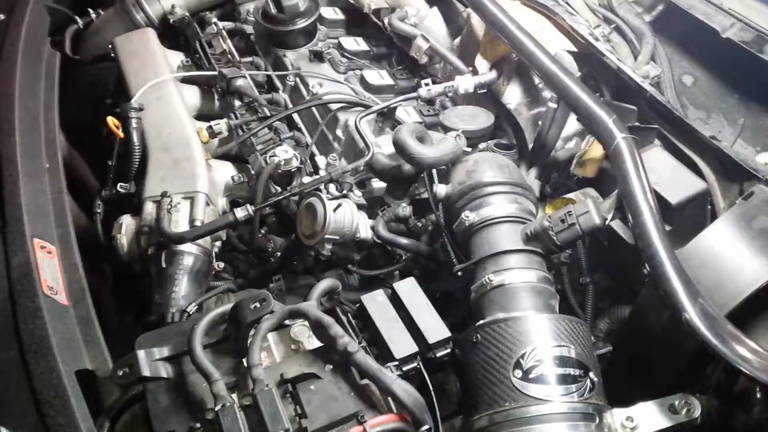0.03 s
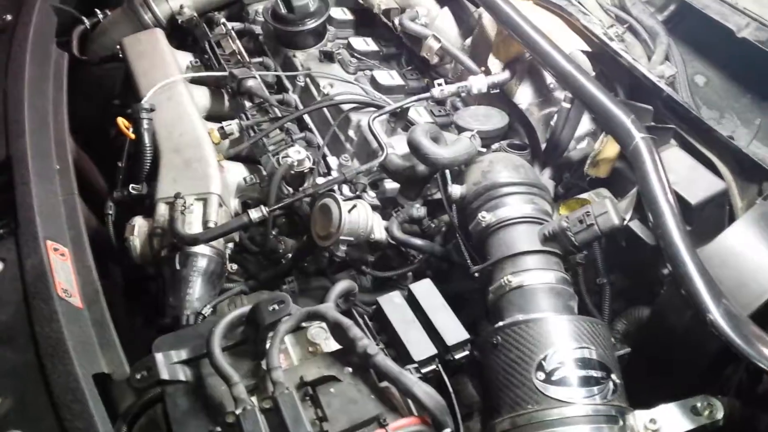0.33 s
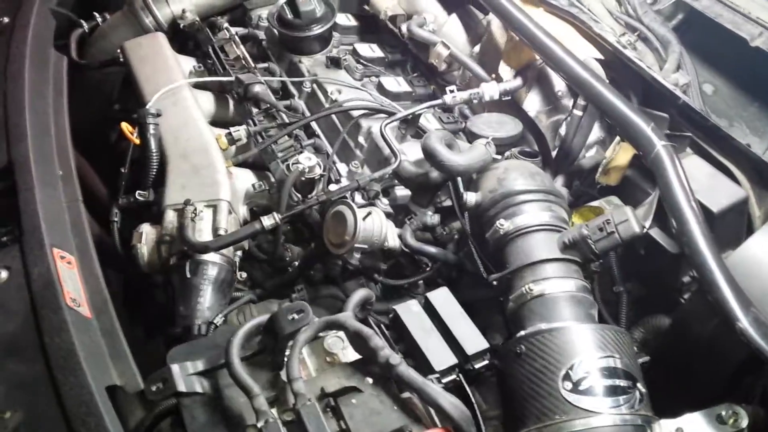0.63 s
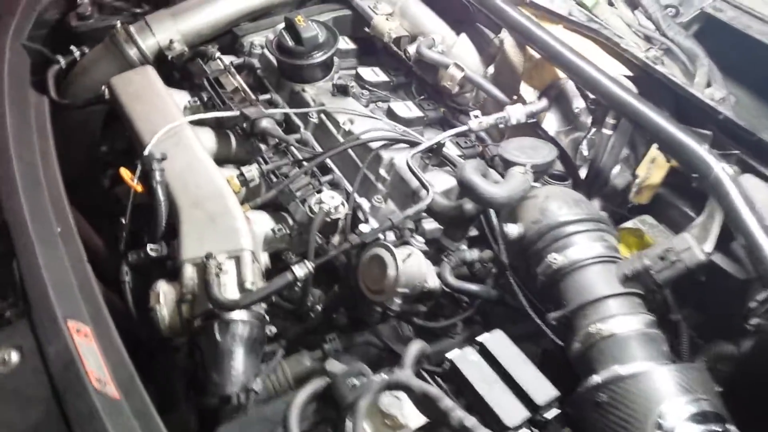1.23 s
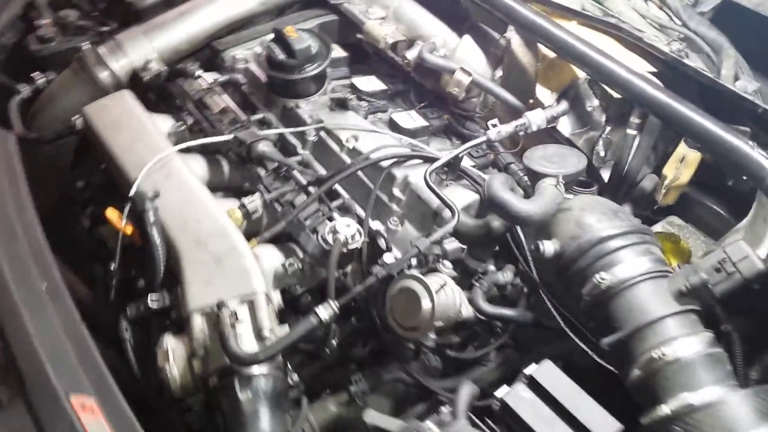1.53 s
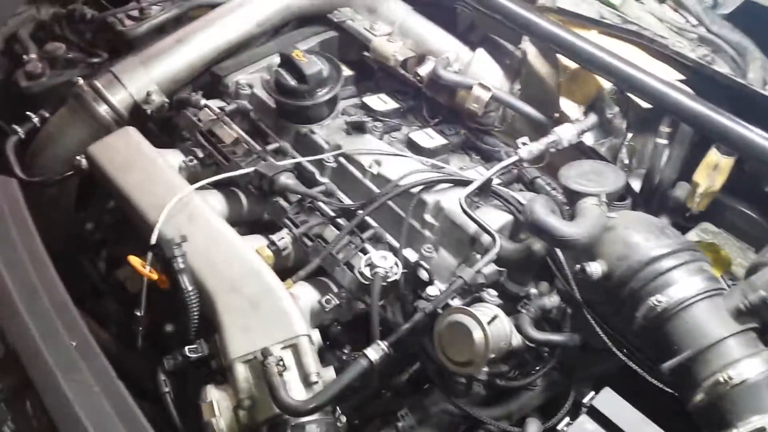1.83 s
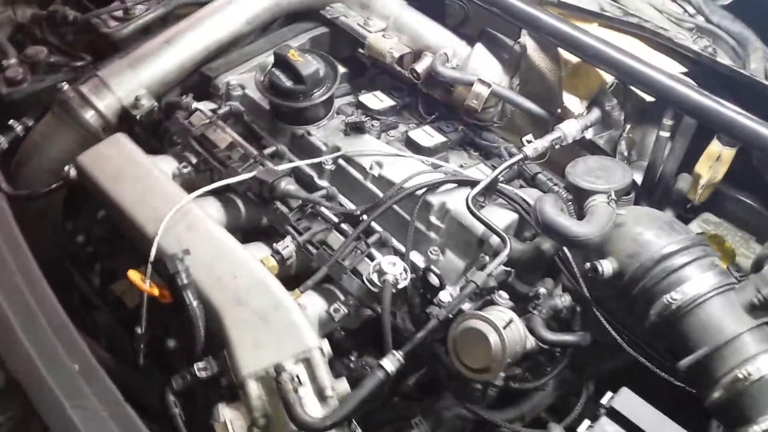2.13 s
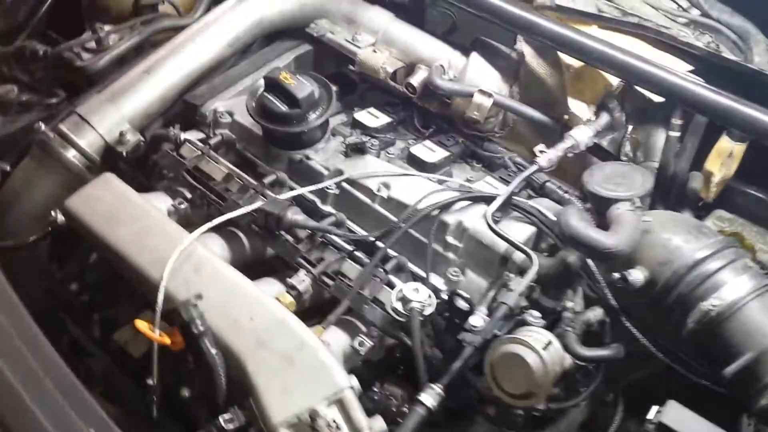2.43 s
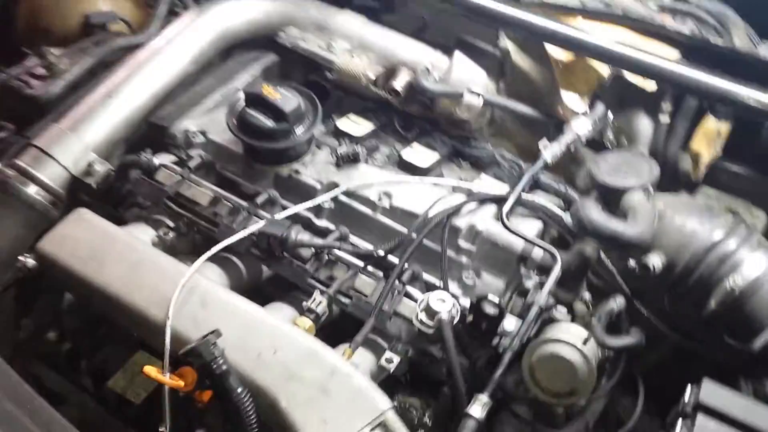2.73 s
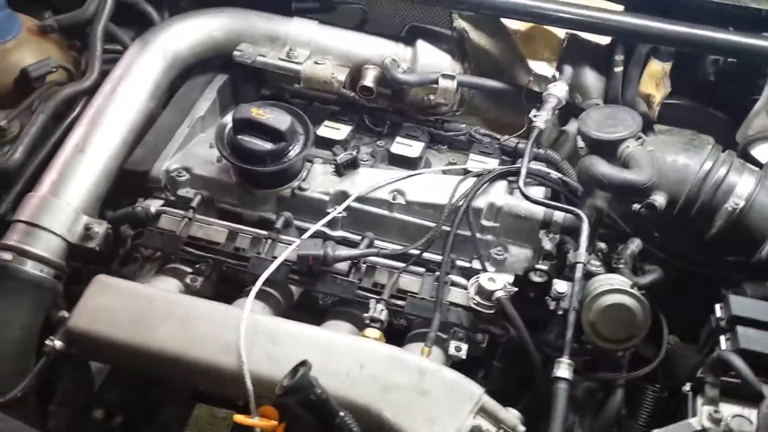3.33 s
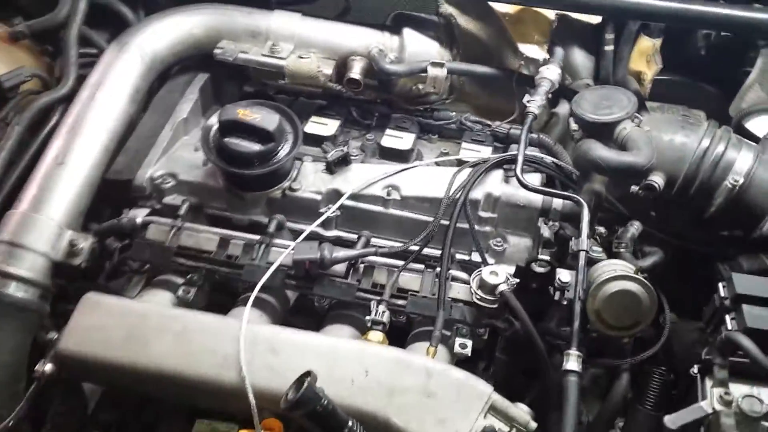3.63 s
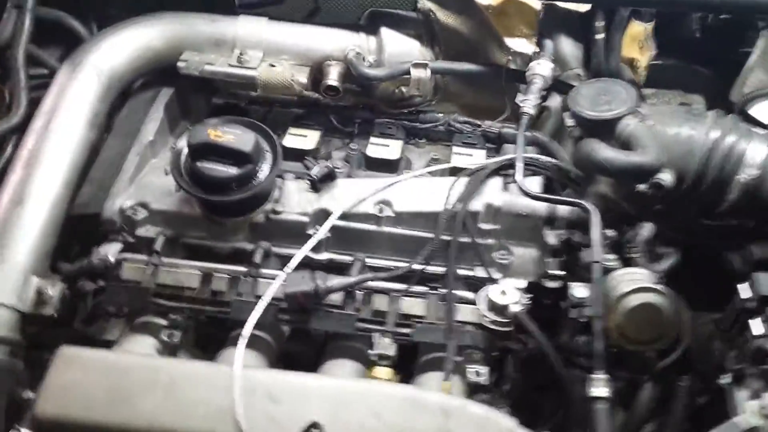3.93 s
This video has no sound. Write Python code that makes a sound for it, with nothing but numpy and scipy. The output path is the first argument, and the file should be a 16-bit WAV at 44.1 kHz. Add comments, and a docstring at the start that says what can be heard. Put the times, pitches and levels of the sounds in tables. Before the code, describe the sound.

An idling car engine hums and clatters up close, with fast, light ticks growing louder.

```python
"""Idling engine, bonnet up

A four-cylinder petrol engine idles, heard from just above the open bay. The firing drones, the
belts whine faintly, the valve gear clatters and hisses, and the injectors tick in turn. It all
fades in after a short silence; the ticks grow as the listener drifts towards the cylinder head."""
import sys
import numpy as np
from scipy import signal
from scipy.fft import rfft, irfft
from scipy.io import wavfile
from scipy.ndimage import uniform_filter1d, map_coordinates

SR = 44100
rng = np.random.default_rng(int(sys.argv[2]) if len(sys.argv) > 2 else 0)


def generate_wav(sig):
    """Save sig (samples, or channels by samples) to the path in sys.argv[1] as 16-bit PCM at SR."""
    pcm = np.round(np.clip(np.atleast_2d(sig).T, -1, 1) * 32767).astype(np.int16)
    wavfile.write(sys.argv[1], SR, pcm)


N = 176400
TIME = np.arange(N) / SR
START_S = 0.424

# Idle speed of the crank: time_s, speed_rpm
CRANK_SPEED = [(0.45, 1207.9), (0.9, 1233.1), (1.35, 1234.4), (1.9, 1223.6), (2.1, 1211.0), (2.3, 1218.9),
               (2.65, 1214.4), (2.95, 1232.4), (3.2, 1235.7), (3.4, 1223.2), (3.55, 1231.5), (3.75, 1218.1),
               (4.0, 1221.7)]
# Level ride on the main boom: time_s, level_db
BOOM_RIDE = [(0.72, -14.5), (1.02, -15), (1.07, -13.5), (2.12, -16.5), (2.32, -13.5), (2.79, -16.5),
             (3.2, -15), (3.49, -19), (3.63, -15.5), (3.78, -17.5), (3.95, -16)]
# The drone's other partials: multiple_of_cycle, level_db, waver_depth
DRONE_PARTIALS = [(4, -30, 0.14), (15, -34.5, 0.73), (18, -40, 1), (19, -40.5, .7), (20, -31.5, 0.38),
                  (24, -33.5, 0.63), (32, -47, 0.85)]
# Belt and pulley tones: multiple_of_cycle, then level_db at four evenly spaced times
BELT_TONES = [(30, -38, -48.5, -51, -46), (34.9, -45, -49, -47, -47), (37.9, -50, -45, -37.5, -42.5),
              (45.5, -31, -42, -37, -36.5), (48, -43, -41, -37, -35.5), (52, -53, -52, -38, -31.5),
              (56, -52, -38, -49.5, -32), (76.07, -55, -38.5, -36, -33), (112.8, -39, -49.5, -42, -44),
              (150.8, -64, -43, -43.5, -46), (162.8, -61, -55, -46.5, -44.5), (175.6, -45, -53, -55, -67)]
# Tone of the block, clatter below and hiss above: frequency_hz, level_db
BLOCK_EQ = [(20, -10), (60, -2), (100, 10), (140, 12), (185, 7), (240, 8.5), (340, 0.5), (420, 6), (480, 6),
            (580, 5.5), (730, 1), (950, 0.5), (1130, 2), (1330, -4), (1650, -3), (2200, -3.5)]
HISS_EQ = [(2300, -4), (2800, -2), (3650, -3), (4200, 0), (4800, -1.5), (5250, -2), (6050, -4.5),
           (6500, -8), (7300, -8.5), (8000, -6.5), (8800, -9), (12000, -13), (15500, -14)]
# EQ rides on the clatter: time_s, hum_db, low_mids_db, mids_db, presence_db, treble_db
BAND_RIDES = [(.7, -0.5, -1.5, 1, -2.5, -1), (.95, 6, -2, 1.5, -1, 0), (1.3, -4, -1.5, -0.5, -2, -.5),
              (1.8, 3.5, -.5, 0, -1.5, 0), (2.4, -3, -1, 0.5, -1, 1), (3, 0, 0, 0.5, 1.5, 0.5),
              (3.5, -6, 2, 0.5, 0.5, 0), (3.95, 0, 1, 2, 1.5, 2)]
# A low anchor, then the centres of those five bands: frequency_hz
BAND_CENTRES = [60, 200, 500, 1300, 2700, 6000]
# Passing rings in the hiss: peak_s, half_length_s, pitch_hz, half_width_hz, lift_db
HISS_RINGS = [(0.766, .1, 6190, 130, 9), (1.096, 0.24, 5260, 111, 7.5), (1.164, .2, 7850, 150, 7.5),
              (1.302, 0.16, 5720, 150, 3), (1.493, 0.091, 4200, 170, 4.5), (1.55, 0.16, 3160, 170, 6),
              (1.57, .14, 5100, 100, 7), (1.694, 0.24, 3950, 100, 10.5), (2.14, 0.18, 6940, 100, 9),
              (2.816, 0.19, 6100, 110, 4), (3.08, 0.16, 5020, 80, 2), (2.98, .15, 4200, 110, 2),
              (3.35, 0.32, 6030, 90, 7), (3.6, 0.66, 3520, 109.4, 5.5)]
# How much of the clatter comes round every cycle: frequency_hz, power_share
LOOP_SHARE = [(100, .4), (500, 0.59), (1200, 0.33), (4000, 0.34), (12000, 0.053)]
# Pan of the clatter: frequency_hz, left_minus_right_db
CLATTER_PAN = [(100, -6), (280, -1), (480, -4), (750, -5.5), (1200, -2), (2000, -4), (3200, -4.5),
               (4200, -10.5), (4900, -11.5), (5900, -11), (6700, -8), (7800, -16.5), (9000, -14.5),
               (12000, -14.5), (15000, -26)]
# Stereo focus of the clatter: frequency_hz, left_right_correlation
CLATTER_FOCUS = [(100, 0.72), (250, 1), (550, 0.66), (800, 0.62), (1100, 0.19), (2000, -0.21),
                 (15000, 0.24)]
# Injector timing: cycle_fraction, relative_level_db
INJECTOR_TIMING = [(.186, 5.5), (0.435, 4), (0.683, 2.5), (.936, 7.5)]
# Ring of an injector body: pitch_hz, relative_level_db, decay_s
INJECTOR_MODES = [(10830, -7.5, 0.0035), (11135, -9.5, 0.0016), (11234, -5.5, 0.0073), (13500, 4.5, 0.0024),
                  (13130, -1, 0.0025), (14600, -6, .002)]
# Colour of the click scattered by the bay: frequency_hz, level_db
SCATTER_EQ = [(1500, -25), (3500, -12.5), (7000, -6), (10000, -6), (11200, 4.5), (12400, -7), (13300, -13),
              (15500, -6)]


def amp(db):
    """Decibels to gain."""
    return 10 ** (np.asarray(db) / 20)


def unit(x):
    """Scales to rms 1."""
    return x / np.sqrt(np.mean(x ** 2) + 1e-20)


def at_hz(points, hz):
    """Reads a curve on a log-frequency axis."""
    f, value = np.transpose(points)
    return np.interp(np.log(hz + 1), np.log(f + 1), value)


def panned(x, left_db):
    """Pans by the level of the left side against the right."""
    gains = np.array([[amp(left_db)], [1]])
    return x * gains / gains.mean()


def wander(rate_hz, size=1024):
    """Slow random motion of rms 1."""
    f = np.fft.rfftfreq(size, TIME[-1] / size)
    slow = unit(irfft(rfft(rng.standard_normal(size)) / (1 + (f / rate_hz) ** 4), size))
    return np.interp(TIME, np.linspace(0, TIME[-1], size), slow)


def tone(turns, waver, rate_hz):
    """A partial of rms 1 that wavers in level and phase."""
    wobble = 1 + waver * (wander(rate_hz) + 1j * wander(rate_hz)) / np.sqrt(2)
    return unit((wobble * np.exp(2j * np.pi * turns)).real)


def drift_fades(spots=4):
    """Equal-power crossfades between the spots the listener drifts through."""
    offset = TIME / TIME[-1] * (spots - 1) - np.arange(spots)[:, None]
    return np.cos(np.pi / 2 * np.clip(offset, -1, 1))


def firing_drone(cycle, left_lag_s=0.00017):
    """Four firings a cycle drone; their third harmonic booms and hurries with each power stroke."""
    surge_turns = 0.047 * (1 + 0.25 * wander(rate_hz=2.5)) * np.sin(2 * np.pi * 4 * cycle)
    boom_gain = amp(0.5 + np.interp(TIME, *np.transpose(BOOM_RIDE)))
    boom = boom_gain * tone(12 * cycle + surge_turns, waver=0.037, rate_hz=6.2)
    hum = boom + sum(amp(db) * tone(multiple * cycle + rng.random(), waver, rate_hz=2.75)
                     for multiple, db, waver in DRONE_PARTIALS)
    left = np.interp(TIME - left_lag_s, TIME, hum)
    return panned(np.array([left, hum]), left_db=-2)


def belt_whine(cycle):
    """Belt teeth and pulleys sing in step with the crank."""
    times = np.linspace(START_S, TIME[-1], 4)
    whine = np.zeros(N)
    for multiple, *levels_db in BELT_TONES:
        gain = amp(np.interp(TIME, times, levels_db))
        whine += gain * tone(multiple * cycle + rng.random(), waver=0.27, rate_hz=7.7)
    return panned(whine, left_db=-5)


def rattle_loop(cycle, size=4320):
    """A rattle that comes round every cycle and slowly changes its pattern."""
    position = [cycle % 1 * size]
    return unit(sum(fade * map_coordinates(rng.standard_normal(size), position, mode="grid-wrap")
                    for fade in drift_fades()))


def block_colour(hz, t, flicker_db=1.9, patch_hz=110, patch_s=0.3):
    """The block and bay as a moving EQ in dB: bands swell, narrow rings pass, the top flickers."""
    eq_db = at_hz(BLOCK_EQ + HISS_EQ, hz)[:, None]
    times, *rides = np.transpose(BAND_RIDES)
    for ride, band in zip(rides, np.eye(len(BAND_CENTRES))[1:]):
        shape = at_hz(list(zip(BAND_CENTRES, band)), hz)
        eq_db = eq_db + np.outer(shape, np.interp(t, times, ride))
    for peak_s, half_s, ring_hz, half_hz, lift_db in HISS_RINGS:
        bell = np.exp(-((hz - ring_hz) / half_hz) ** 2)
        swell = np.exp(-((t - peak_s) / half_s) ** 2)
        eq_db += lift_db * np.outer(bell, swell)
    patches = rng.standard_normal((2, len(hz), len(t)))
    patches = uniform_filter1d(patches, round(patch_hz / hz[1]), axis=1)
    patches = unit(uniform_filter1d(patches, round(patch_s / t[1]), axis=2))
    return eq_db + flicker_db * patches * (hz / (hz + 800))[:, None]


def valve_clatter(cycle, taps_per_cycle=16, tap_decay_s=0.0055, level_db=-23):
    """Valve taps pulse the noise of rubbing parts, partly alike each cycle, coloured by the block."""
    slot = (cycle * taps_per_cycle).astype(int)
    taps = np.diff(slot, prepend=0) * amp(3 * rng.standard_normal(N).clip(-2, 2))
    pulse = 1 + 0.23 * signal.lfilter([1], [1, -np.exp(-1 / (tap_decay_s * SR))], taps)
    drive = np.array([rattle_loop(cycle), rattle_loop(cycle), *rng.standard_normal((2, N))]) * pulse
    hz, t, spectra = signal.stft(drive, SR, nperseg=2048, noverlap=1536)
    looped = at_hz(LOOP_SHARE, hz)[:, None]
    right, unrelated = np.sqrt(looped) * spectra[:2] + np.sqrt(1 - looped) * spectra[2:]
    # Tight lows and wide highs, leaning right.
    focus = at_hz(CLATTER_FOCUS, hz)[:, None]
    lean = amp(at_hz(CLATTER_PAN, hz))[:, None]
    left = lean * (focus * right + np.sqrt(1 - focus ** 2) * unrelated)
    stereo = np.array([left, right]) / np.sqrt(1 + lean ** 2 + 2 * focus * lean)
    stereo *= amp(block_colour(hz, t))
    clatter = signal.istft(stereo, nperseg=2048, noverlap=1536)[1][:, :N]
    return amp(level_db) * clatter / clatter.mean(0).std()


def needle_click(attack_s=0.00022, snap_s=0.003, bay_tail_s=0.011, detune=0.0148):
    """One needle strike in stereo: the injector body rings and the bay scatters a burst."""
    t = TIME[:SR // 25]
    envelope = np.hypot(np.exp(-t / snap_s), amp(-5) * np.exp(-t / bay_tail_s))
    burst = envelope * rng.standard_normal((2, len(t)))
    colour = amp(at_hz(SCATTER_EQ, np.fft.rfftfreq(2 * len(t), 1 / SR)))
    scatter = irfft(rfft(burst, 2 * len(t)) * colour)[:, :len(t)]
    ring = 0
    for hz, db, decay_s in INJECTOR_MODES:
        turns = hz * (1 + detune * rng.standard_normal()) * t + rng.random((2, 1))
        ring += amp(db) * np.exp(-t / decay_s) * np.sin(2 * np.pi * turns)
    return unit((unit(ring) + amp(3) * unit(scatter)) * (1 - np.exp(-t / attack_s)))


def injector_ticks(cycle, open_s=0.0042, spread_db=2, growth_db_per_s=1.95, left_db=-15):
    """Each needle clicks open and shut once a cycle, never quite alike, louder as the listener nears."""
    ticks = np.zeros((2, N))
    for place, db in INJECTOR_TIMING:
        opens = amp(db) * np.diff(np.floor(cycle - place), prepend=-1)
        shuts = amp(-0.5) * np.roll(opens, round(open_s * SR))
        for fade in drift_fades():
            force = (opens + shuts) * fade * amp(spread_db * rng.standard_normal(N))
            ticks += signal.oaconvolve(force[None], needle_click(), axes=1)[:, :N]
    approach = amp(-27.5 + growth_db_per_s * (TIME - TIME.mean()))
    return unit(ticks) * approach * np.array([[amp(left_db)], [1]])


def scene():
    """Every layer locks to the four-stroke cycle: two turns of the crank."""
    rpm = np.interp(TIME, *np.transpose(CRANK_SPEED))
    cycle = np.cumsum(rpm) / (2 * 60 * SR)
    return firing_drone(cycle) + belt_whine(cycle) + valve_clatter(cycle) + injector_ticks(cycle)


def record(dry):
    """Fades the mix in out of silence and trims the very top of the treble."""
    fade_from_s, fade_s, cutoff_hz = 0.41, 0.29, 15600
    fade = np.clip((TIME - fade_from_s) / fade_s, 0, 1) * (TIME > START_S)
    lowpass = signal.firwin(511, cutoff_hz, window=("kaiser", 9), fs=SR)
    return signal.oaconvolve(dry * fade, lowpass[None], "same")


dry = scene()
out = record(dry)
generate_wav(out)
```